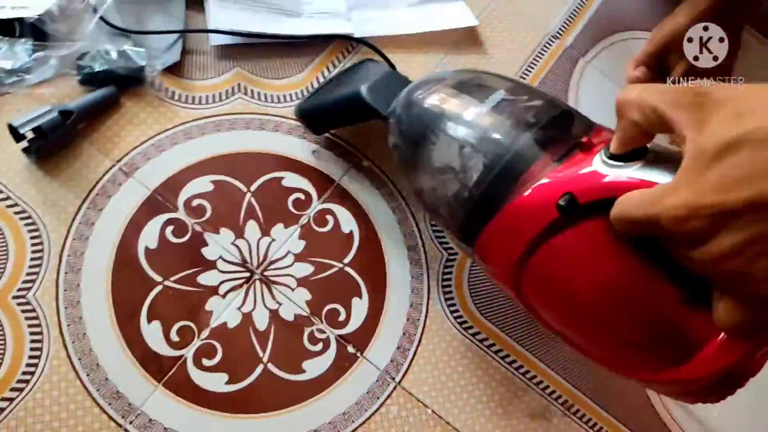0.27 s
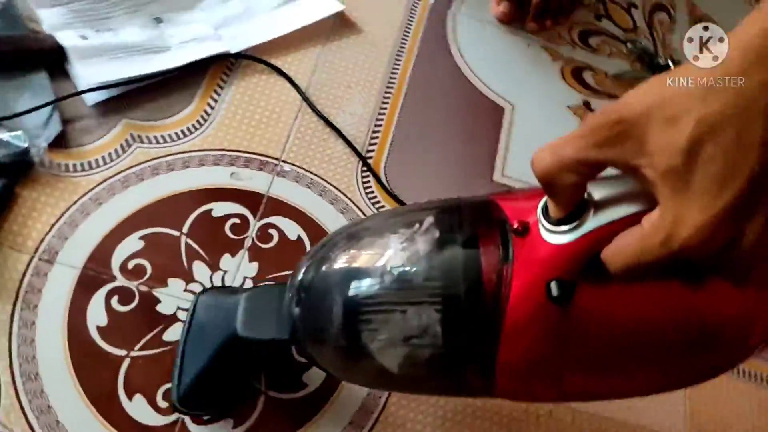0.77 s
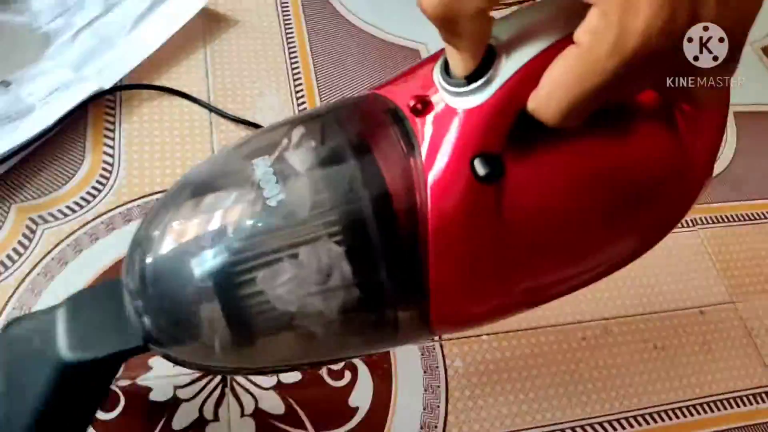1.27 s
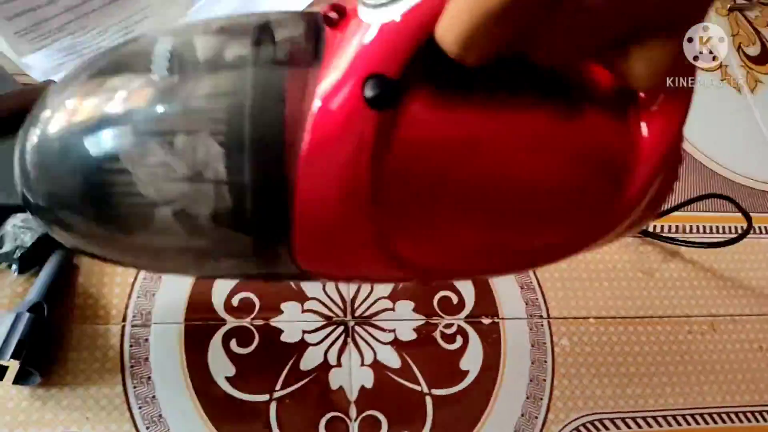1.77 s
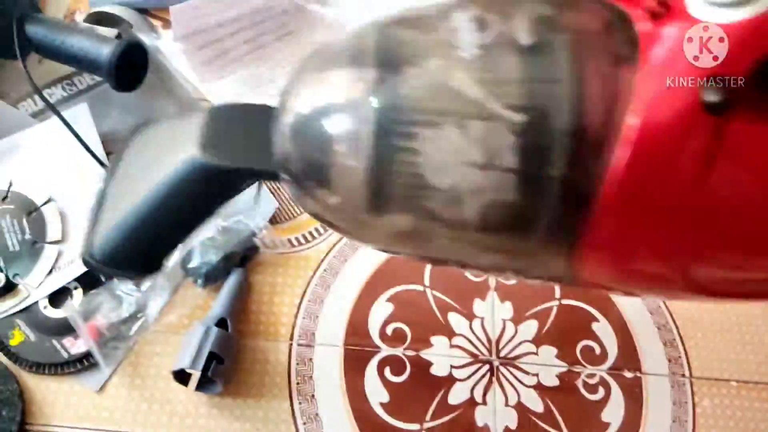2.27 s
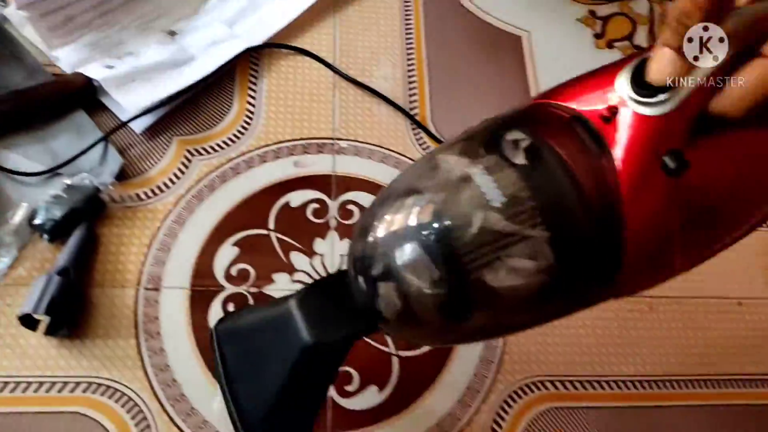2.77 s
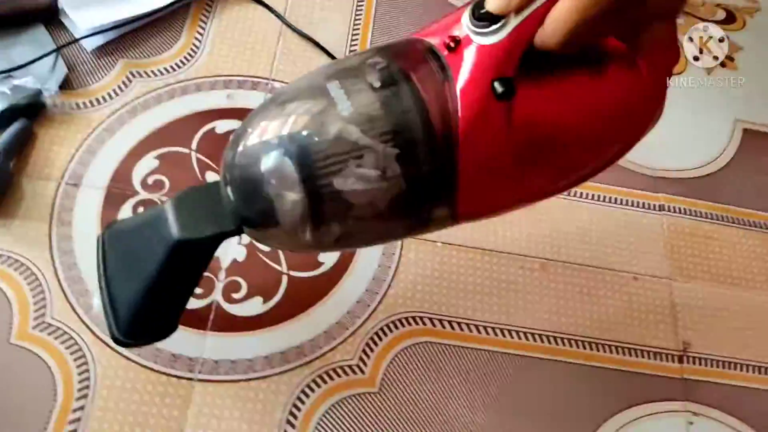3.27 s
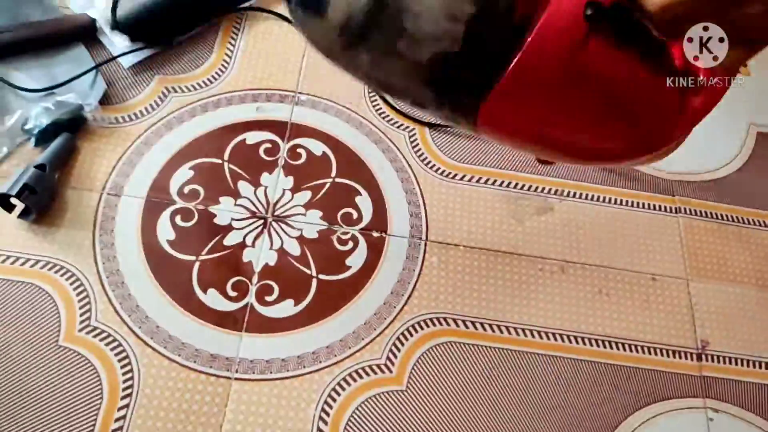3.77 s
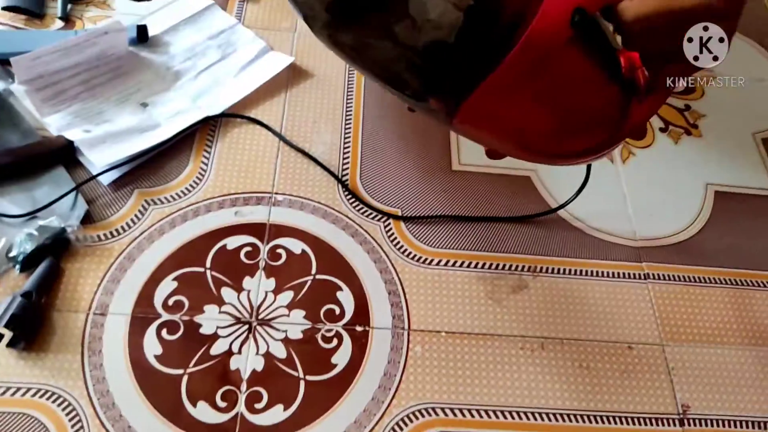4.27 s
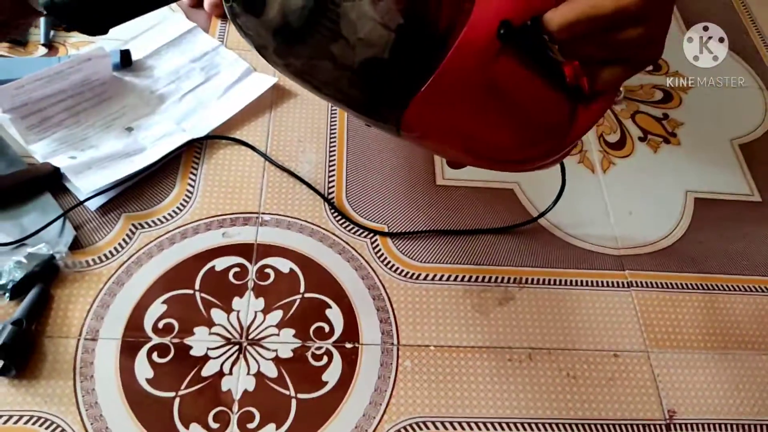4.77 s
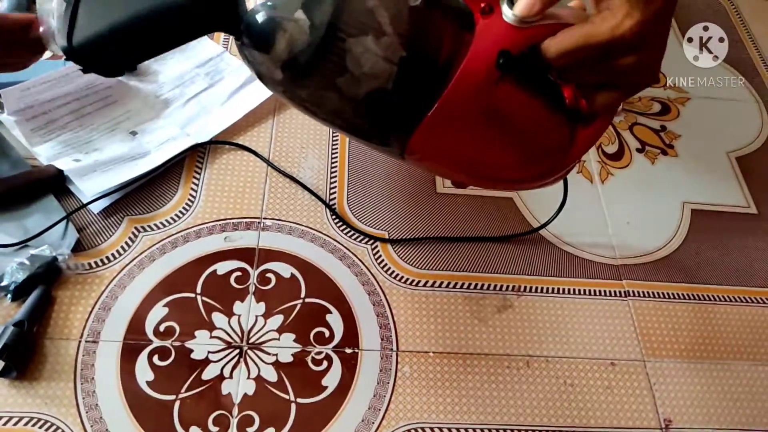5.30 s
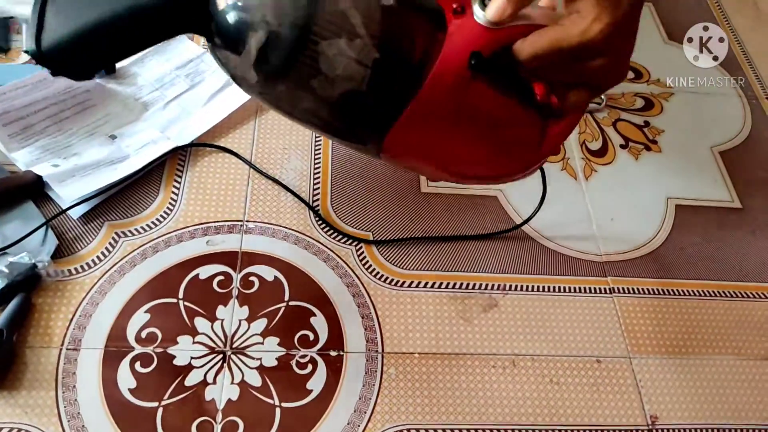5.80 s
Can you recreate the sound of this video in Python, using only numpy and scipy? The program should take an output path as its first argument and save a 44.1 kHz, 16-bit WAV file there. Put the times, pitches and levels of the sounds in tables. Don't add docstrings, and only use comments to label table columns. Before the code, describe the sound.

Close handheld vacuum with rushing air and whistling whine, sealed with a thump, then switched off, its pitch gliding down to a faint hum before a click.

```python
import sys
import numpy as np
from scipy import signal
from scipy.fft import rfft, irfft, next_fast_len
from scipy.io import wavfile
from scipy.ndimage import uniform_filter1d, minimum_filter1d, map_coordinates

SR = 44100
rng = np.random.default_rng(int(sys.argv[2]) if len(sys.argv) > 2 else 0)


def elevation(decibels):
    levels = np.asarray(decibels, float)
    return 10 ** (levels / 20)


def generate_wav(signal):
    frames = np.transpose(np.atleast_2d(signal))
    scaled = np.clip(frames, -1, 1) * 32767
    pcm = np.round(scaled).astype(np.int16)
    wavfile.write(sys.argv[1], SR, pcm)


N = 266408

# (time [s], share [0-1])
NOZZLE_COVER = [
    (2.19, 0.03),
    (2.33, 0.99),
]
# (time [s], share [0-1])
FLOW_SLOWED = [
    (2.9, 0.06),
    (5.0, 0.88),
]
# (time [s], turns per second [Hz])
SHAFT_SPEED = [(0.0, 459.0), (0.5, 466.0), (2.18, 469.6), (2.4, 489.7), (2.6, 502.7), (2.765, 509.4),
               (2.9, 482.4), (3.15, 429.0), (3.4, 384.3), (3.7, 338.6), (4.0, 299.5), (4.33, 260.9),
               (4.72, 222.5), (5.11, 190.8), (5.5, 164.4), (5.76, 149.0), (6.04, 136.0)]
# (time [s], nearness [dB], slots facing the phone [dB], left-right [dB])
HAND = [(0.0, -1.5, 1.5, -0.5), (0.25, -0.5, 8.5, -1), (0.6, 0.1, 6, -1), (0.85, 0.5, 3, 0),
        (1.2, 1.2, -5, -1), (1.5, 1, 11, 0), (1.85, 1, 0.5, -0.6), (2.08, 1, -6, -0.6),
        (2.35, -0.2, 6.5, -0.5), (2.7, -2, 2, -1), (3.1, 0.1, 5.5, 0.15), (3.8, 1.5, 6, -0.5),
        (4.3, 2, -0.5, -0.2), (5.0, 2.5, -8, -0.5), (6.0, 1.3, -14, 0.1)]
# (time [s], level [dB])
DIP = [
    (2.19, 0),
    (2.262, -2),
    (2.3, 1),
    (2.42, 3),
]

# (frequency [Hz], level per Hz [dB])
RUMBLE = [
    [(15, -66), (25, -67), (70, -20), (113, -17), (155, -4), (221, -7.5), (314, -3.5), (419, -4), (461, -2.5), (542, -5), (1150, -3.5), (1500, -50), (2530, -120)],
    [(15, -75), (35, -52), (60, -44), (118, -14), (152, 1), (222, -5.5), (402, -15.5), (435, 6), (569, -10.5), (676, 2), (737, -3.5), (1150, -9.5), (1500, -42), (2530, -120)],
    [(15, -44), (25, -9), (64, -10.5), (107, -0.5), (124, -8.5), (176, -1), (221, -6.5), (440, -0.5), (587, -6), (656, -2), (1150, -19), (1500, -53), (2530, -120)],
]
ROAR = [
    [(620, -41), (1050, -12), (1320, -4.5), (1590, -8), (1950, -8), (2060, -6.5), (2190, -7), (2560, -3), (2800, -5.5), (3100, -9.5), (3380, -9.5), (3700, -9.5), (4300, -15), (5590, -48), (9460, -120)],
    [(620, -31), (1050, -9.5), (1130, -11), (1310, -6), (1620, -2.5), (1920, -4), (2400, -6.5), (3380, -15.5), (3980, -19), (4300, -13), (5590, -41), (9460, -120)],
    [(620, -62), (1050, -9.5), (1140, -17), (1290, 0), (1550, -3), (2070, -11.5), (2430, -9), (2710, -17.5), (3790, -19), (4480, -29.5), (4800, -34.5), (6240, -61), (10600, -120)],
]
HISS = [
    [(2350, -20), (4000, -11.5), (4550, -9.5), (5060, -6), (5870, -6), (6310, -6), (7240, 0), (8110, 1), (9190, -2), (10200, -16.5), (10500, -18.5), (13600, -34), (22000, -120)],
    [(2350, -11.5), (4000, -10), (4200, -12.5), (4820, -9.5), (5330, -7), (6260, -6.5), (7270, -1), (8790, 0.5), (10200, -14.5), (10500, -86), (13600, -51), (22000, -120)],
    [(2710, -27.5), (4600, -6), (4840, -8), (6680, -6), (7230, -2), (8620, -3), (9570, -9.5), (10500, -30), (13600, -48), (22000, -120)],
]
FIZZ = [
    [(6060, -55), (10300, -11), (10500, 1.5), (13000, 0.5), (14000, -0.5), (15300, -5)],
    [ (6060, -55), (10300, -12), (11300, -11), (12300, -6), (13300, 0), (14500, 0), (15300, -4) ],
    [(6060, -55), (10300, -4), (10600, 0), (12500, -1), (14000, -2), (15300, -5) ],
]
# (open level [dB], covered level [dB], speed below which it fades [Hz], power of the speed, floor [dB])
RUMBLE_LAW = (-26, -30, 471, 1.71, -50.5)
ROAR_LAW = (-21, -20, 448.5, 2.5, -62)
HISS_LAW = (-15.5, -17, 488.5, 4, -53)
FIZZ_LAW = (-31.5, -41.5, 524, 4, -68.5)
# (frequency [Hz], likeness [-1 to 1])
EAR_LIKENESS = [(60, 0.99), (110, 0.95), (200, 1), (380, 0.74), (700, 0.56), (1280, -0.036), (2370, 0.0012),
                (4370, 0.02), (8050, -0.035), (14900, -0.17)]

# (tone frequency [Hz], level [dB])
UNBALANCE = [(140, -54.5), (185, -49), (200, -49), (218, -39), (231, -41.5), (246, -35.5), (268, -54),
             (292, -33.5), (303, -40), (325, -30), (360, -37), (392, -39), (432, -29.5), (450, -33),
             (465, -36.5), (485, -38.5), (505, -48)]
BLADE = [(1350, -50), (1500, -37), (1700, -35), (1770, -47), (1850, -50), (2000, -44), (2150, -31),
         (2300, -30), (2500, -32), (2750, -28), (3080, -32), (3350, -26.5), (3560, -27.5)]
SECOND = [(2000, -65), (3500, -57), (4200, -60), (5200, -48), (5800, -61), (6400, -31.5), (6900, -39.5),
          (7120, -23)]
THIRD = [(3000, -74), (5000, -59), (6600, -52), (7800, -42), (8600, -39), (9500, -30), (10100, -33),
         (10300, -60)]
BRUSHES = [(9000, -80), (11200, -62), (11700, -57), (12300, -58)]
# (time [s], centre frequency [Hz], level [dB])
DUCT_WHISTLE = [(0.0, 2480, -28), (0.4, 2560, -28), (0.8, 2560, -25.5), (1.15, 2640, -23.5),
                (1.5, 2600, -33.5), (1.85, 2620, -22.5), (2.05, 2580, -47), (2.2, 2500, -44),
                (2.3, 1950, -35), (2.45, 1920, -20), (2.65, 1850, -24.5), (2.95, 1730, -24),
                (3.3, 1650, -25.5), (3.65, 1450, -25.5), (4.1, 1380, -35), (4.6, 1330, -56),
                (6.0, 1300, -46)]

# (time [s], peak [dB], pitch [Hz], time to fall 60 dB [s])
KNOCKS = [(0.071, -10, 1100, 0.051), (.07, -13, 970, 0.058), (.073, -12, 820, 0.073), (.09, -16, 910, 0.04),
          (2.5, -5.5, 2280, 0.027), (2.191, -19, 183, 0.55), (2.192, -15, 410, 0.099),
          (2.203, -14.5, 577, 0.16), (2.196, -18, 70.3, 0.31), (2.5, -19, 470, 0.071),
          (2.291, -21.5, 429.4, 0.25), (2.338, -19, 73, 0.25), (5.807, -16, 800, 0.037),
          (5.808, -18, 650, .05), (5.81, -26, 880, 0.056), (5.807, -24, 1020, .04),
          (5.914, -31, 700, 0.053), (5.823, -25.5, 698, 0.13)]
# (time [s], peak [dB])
CLICK = [
    (5.806, -16.5),
]
# (frequency [Hz], width [Hz], level [dB])
PLASTIC = [(668, 99, 0), (2440, 320, -5), (3750, 300, -2.5), (5330, 250, -12), (6300, 350, -7),
           (7630, 300, 2.5), (9010, 300, -6), (13000, 290, -33)]
# (time [s], level [dB])
RUB_PRESSURE = [
    (5.815, -27),
    (5.847, -30.5),
    (5.939, -31),
    (5.995, -37.5),
    (6.04, -43),
]
# (frequency [Hz], level per Hz [dB])
SHELL = [(240, -48), (400, -19), (440, -6), (530, -16), (680, -5), (800, -7), (1050, -7), (1500, -27),
         (1950, -61), (3300, -120)]
SCRATCH = [(880, -45), (1500, -20), (1790, -18), (1990, -8), (3050, -2.5), (4960, -10.5), (7680, 0.5),
           (9150, -5), (11300, -25), (13900, -22), (15300, -36)]

# (frequency [Hz], time to fall 60 dB [s])
ROOM = [
    (200, 0.8),
    (2000, 0.97),
    (10000, 0.37),
]
# (frequency [Hz], left-right [dB])
PORT_LEAN = [(60, -4), (92, 2.5), (140, 2), (210, 3), (330, 4.5), (500, 3.5), (760, 4), (1170, 2.5),
             (1780, 2), (2730, 1.5), (4160, 3), (6360, -2.5), (9720, 7), (14900, -1.5)]
# (frequency [Hz], level against neighbours [dB])
BAND_LIMIT = [(700, -6), (1500, -1.5), (2500, -.9), (3100, -1.2), (3500, -.2), (4500, 0), (5600, .3),
              (6400, .1), (7200, -.9), (8300, -.9), (9500, -.5), (9800, .3), (10300, 0), (10700, 1.3),
              (12500, 1.1), (14500, .7), (15300, 2.6)]
# (frequency [Hz], level against the hiss [dB])
MASK_LIMIT = [(9650, -60), (9700, -12.5), (10200, -14), (10300, -28.5), (12200, -29), (13200, -38),
              (15000, -41)]
# (frequency [Hz], share of the local rms [0-1])
LINE_LIMIT = [(300, .02), (900, .08), (1600, .17), (2300, .24), (3000, .34), (4000, .42), (6300, .4),
              (7200, .18), (9300, .2), (10000, .45), (15000, .5)]

BLOCK, BLOCK_OFFSET = 1024, 848


def unit(x):
    return x / np.sqrt(np.mean(x ** 2) + 1e-20)


def along(points, hz):
    f, v = np.transpose(points)
    return np.interp(np.log(hz + 1), np.log(f + 1), v)


def curves(rows):
    s, *columns = np.transpose(rows)
    t = np.arange(N) / SR
    return [np.interp(t, s, column) for column in columns]


def wobble(rate):
    points = rng.standard_normal(int(N * rate / SR) + 4)
    return map_coordinates(points, [np.arange(N) * rate / SR])


def filtered(x, response):
    m = next_fast_len(N + SR // 2)
    hz = np.fft.rfftfreq(m, 1 / SR)
    return irfft(rfft(x, m) * response(hz), m)[..., :N]


def rush(spectrum, patchy_db):
    z = signal.stft(rng.standard_normal((2, N)), nperseg=512)[2]
    patches = uniform_filter1d(rng.standard_normal(z.shape[1:]), size=6, axis=0)
    patches = unit(uniform_filter1d(patches, size=8, axis=1))
    pair = signal.istft(z * elevation(patchy_db * patches), nperseg=512)[1][:, :N]

    def colour(hz):
        angle = np.arccos(np.clip(along(EAR_LIKENESS, hz), -1, 1)) / 2
        return elevation(along(spectrum, hz)) * [np.cos(angle), np.sin(angle)]

    mid, side = filtered(pair, colour)
    return unit(np.array([mid + side, mid - side]))


def changing(colours, patchy_db, order=1):
    cover = np.clip(curves(NOZZLE_COVER)[0], 0, 1)
    slowed = np.clip(curves(FLOW_SLOWED)[0], 0, 1) ** order
    shares = (1 - cover, cover * (1 - slowed), cover * slowed)
    return sum(np.sqrt(share) * rush(colour, patchy_db) for share, colour in zip(shares, colours))


def law(rule, cover, speed):
    open_db, covered_db, knee, power, floor_db = rule
    level = elevation(open_db + (covered_db - open_db) * cover)
    return level * np.minimum(speed / knee + 1 - cover, 1) ** power + elevation(floor_db)


def air():
    near_db, _, pan_db = curves(HAND)
    cover, speed = np.clip(curves(NOZZLE_COVER)[0], 0, 1), curves(SHAFT_SPEED)[0]
    dip_db = curves(DIP)[0]
    flutter = wobble(13)

    rumble = law(RUMBLE_LAW, cover, speed) * changing(RUMBLE, patchy_db=1.3)
    noise = elevation(0.29 * near_db) * rumble

    roar = law(ROAR_LAW, cover, speed) * changing(ROAR, patchy_db=1.0)
    noise += elevation(0.65 * near_db + 0.45 * dip_db + 0.39 * flutter) * roar

    hiss = law(HISS_LAW, cover, speed) * changing(HISS, patchy_db=1.01)
    noise += elevation(near_db + dip_db + 0.35 * flutter + 0.36 * wobble(60)) * hiss

    fizz = law(FIZZ_LAW, cover, speed) * changing(FIZZ, patchy_db=2.0, order=2)
    noise += elevation(near_db + 2.9 * dip_db + 0.83 * wobble(12)) * fizz
    return noise * elevation(0.87 * np.array([pan_db, -pan_db]))


def tone(turns, level_db, drift, waver_db, spread):
    phase = 2 * np.pi * turns + drift * wobble(60)
    apart = spread * wobble(8)
    left_waver = wobble(90) + 0.69 * wobble(6.3)
    right_waver = wobble(90) + 0.11 * wobble(7.9)
    size = np.sqrt(2) * elevation(level_db + waver_db * np.array([left_waver, right_waver]))
    return size * np.sin([phase + apart, phase - apart])


def fan():
    facing_db, speed = curves(HAND)[1], curves(SHAFT_SPEED)[0]
    turns = np.cumsum(speed) / SR
    share = speed / speed.max()
    blades, bars = 7, 24
    seal_s, seal_rise_s = 2.195, 0.012
    inlet = np.clip(1 - (np.arange(N) / SR - seal_s) / seal_rise_s, 0, 1)

    shaft_db = along(UNBALANCE, speed) + inlet * (4 * wobble(7) - 5.5)
    sound = tone(turns, shaft_db, drift=0.053, waver_db=1.5, spread=0.05)

    blade_db = along(BLADE, blades * speed) - 13 * inlet + (0.4 + 0.5 * inlet) * facing_db
    blade_db += 3 * inlet * wobble(12) - 1.5
    sound += tone(blades * turns, blade_db, drift=0.24 * share, waver_db=4.2 * share, spread=0.6)

    second_db = along(SECOND, 2 * blades * speed) - 2 * inlet + 1.2 * facing_db - 3.5
    sound += tone(2 * blades * turns, second_db, drift=1.05, waver_db=2.5, spread=0.8)

    third_db = along(THIRD, 3 * blades * speed) - 13 * inlet + 0.25 * facing_db - 2
    sound += tone(3 * blades * turns, third_db, drift=1.3, waver_db=2.5, spread=0.8)

    brush_db = along(BRUSHES, bars * speed) - 20 * inlet
    return sound + tone(bars * turns, brush_db, drift=1.6, waver_db=4, spread=0.8)


def duct():
    hz, level_db = curves(DUCT_WHISTLE)
    width_hz = 120
    swirl = filtered(rng.standard_normal((2, 2, N)), lambda f: 1 / (1 + (f / width_hz) ** 2))
    phase = 2 * np.pi * np.cumsum(hz) / SR
    whistle = unit(swirl[0] * np.cos(phase) + swirl[1] * np.sin(phase))
    return elevation(level_db + 1.5 * wobble(11)) * whistle


def knocks():
    out, t = np.zeros(N + SR), np.arange(SR // 2) / SR
    for s, db, hz, t60 in KNOCKS:
        roughness = np.cumsum(0.072 * rng.standard_normal(len(t)))
        ring = np.sin(2 * np.pi * hz * t + roughness)
        onset = 1 - np.exp(-t / 0.0034)
        out[round(s * SR):][:len(t)] += elevation(db - 60 * t / t60) * onset * ring
    return out[:N]


def click():
    crack, t = np.zeros(N), np.arange(SR // 50) / SR
    s, db = CLICK[0]
    crack[round(s * SR):][:len(t)] = elevation(-60 * t / 0.013) * rng.standard_normal(len(t))

    def shell(f):
        total = 0
        for k, (centre, width, level_db) in enumerate(PLASTIC):
            resonance = 1j * f * width / (centre * centre - f * f + 1j * f * width)
            total = total + (-1) ** k * elevation(level_db) * resonance
        return total

    snap = filtered(crack, shell)
    return elevation(db + 1.0) * snap / np.abs(snap).max()


def rub():
    start_s = RUB_PRESSURE[0][0]
    press_db, = curves([(start_s - 0.008, -120)] + list(RUB_PRESSURE))
    shell_db = press_db - 5.5 - 10 * np.maximum(np.arange(N) / SR - start_s, 0)
    grain = elevation(0.65 * wobble(150))
    ring = elevation(shell_db) * rush(SHELL, patchy_db=2)
    scratch = elevation(press_db - 3.5) * rush(SCRATCH, patchy_db=1.0)
    return grain * (ring + scratch)


def room(x):
    hz, t, z = signal.stft(rng.standard_normal((2, SR // 2)), SR, nperseg=256)
    fade = elevation(-60 * t / along(ROOM, hz)[:, None])
    tail = signal.istft(z * fade, SR, nperseg=256)[1]
    late = np.pad(x, (300, 0))[None]
    return signal.fftconvolve(late, tail / np.linalg.norm(tail[0]), axes=1)[:, :N]


def scene():
    whine, hits = fan(), knocks() + click()
    wet = room(elevation(-2.5) * whine[0] + elevation(-13.5) * hits)
    return air() + duct() + whine + rub() + hits * elevation([[1.2], [-1.2]]) + wet


def lapped(x):
    n, k, lead = np.arange(2 * BLOCK), np.arange(BLOCK), 2 * BLOCK - BLOCK_OFFSET
    window = signal.windows.kaiser_bessel_derived(2 * BLOCK, 4 * np.pi)
    count = (N + lead) // BLOCK + 2
    padded = np.pad(x, ((0, 0), (lead, (count + 1) * BLOCK - N - lead)))
    spin = np.exp(-1j * np.pi * n / (2 * BLOCK))
    turn = np.exp(-1j * np.pi * (BLOCK + 1) * (k + 0.5) / (2 * BLOCK))
    blocks = padded[:, np.arange(count)[:, None] * BLOCK + n]
    z = np.fft.fft(blocks * window * spin)[..., :BLOCK] * turn

    def back(kept):
        y = np.fft.ifft(kept.transpose(0, 2, 1) / turn, 2 * BLOCK) / spin
        y = 4 * window * y.real
        joined = y[:, 1:, :BLOCK] + y[:, :-1, BLOCK:]
        return joined.reshape(len(x), -1)[:, lead - BLOCK:][:, :N]

    return (k + 0.5) * SR / (2 * BLOCK), z.transpose(0, 2, 1), back


def smooth(v, bands, blocks):
    return uniform_filter1d(uniform_filter1d(v, size=bands, axis=0), size=blocks, axis=1)


def thinned(x):
    hz, z, back = lapped(x)
    power = np.mean(np.abs(z) ** 2, axis=0)
    near = smooth(power, 5, 3)
    level = np.log(power + 1e-20)
    capped = np.minimum(level, smooth(level, 31, 5) + 0.6)
    around = np.exp(smooth(capped, 31, 5) + 0.1)
    around = np.minimum(around, 2 * np.roll(around, 2, axis=1))
    keep = near > around * elevation(2 * along(BAND_LIMIT, hz))[:, None]
    keep = minimum_filter1d(keep.astype(float), size=5, axis=0)
    keep = minimum_filter1d(keep, size=2, axis=1) > 0
    hiss = uniform_filter1d(power[(hz > 7000) & (hz < 9300)].mean(axis=0), size=3)
    keep &= uniform_filter1d(near, size=9, axis=0) > hiss * elevation(2 * along(MASK_LIMIT, hz))[:, None]
    bright = power[hz > 2500].sum(axis=0)
    sudden = bright > 3 * np.roll(bright, 2)
    keep |= sudden & ~np.roll(sudden, 1)
    keep |= (sudden | np.roll(sudden, -1)) & (hz < 9900)[:, None]
    pair = np.array([z[0] + z[1], z[0] - z[1]]) / 2
    local = np.sqrt(uniform_filter1d(np.abs(pair) ** 2, size=17, axis=1) / 2)
    mid, side = pair.real * (np.abs(pair.real) > local * along(LINE_LIMIT, hz)[:, None])
    bass_cut_hz = 90
    bass_cut = np.sqrt(1 + (bass_cut_hz / (hz[:, None] + 1)) ** 4)
    return back(np.array([mid + side, mid - side]) * keep / bass_cut)


def top_cut(x):
    return signal.sosfilt(signal.butter(12, 15460, fs=SR, output="sos"), x)


def record(dry):
    sides = np.array([[1], [-1]])
    ports = filtered(dry, lambda hz: elevation(along(PORT_LEAN, hz) / 2 * sides))
    ports = ports / (1 + np.abs(ports / 0.8) ** 6) ** (1 / 6)
    mix = thinned(ports)
    return top_cut(mix)


dry = scene()
out = record(dry)
generate_wav(out)
```